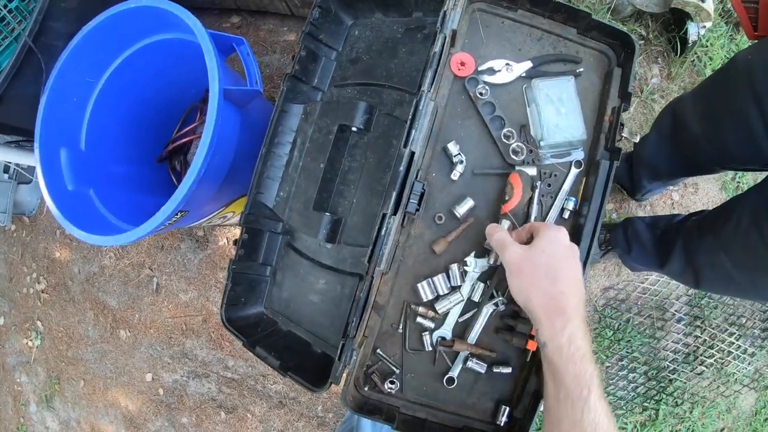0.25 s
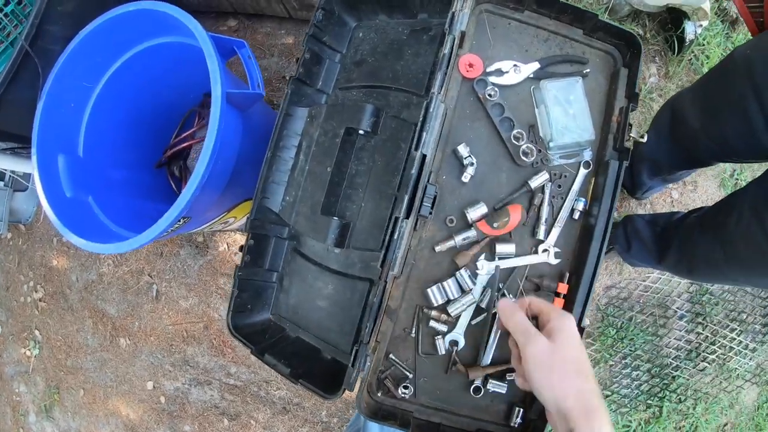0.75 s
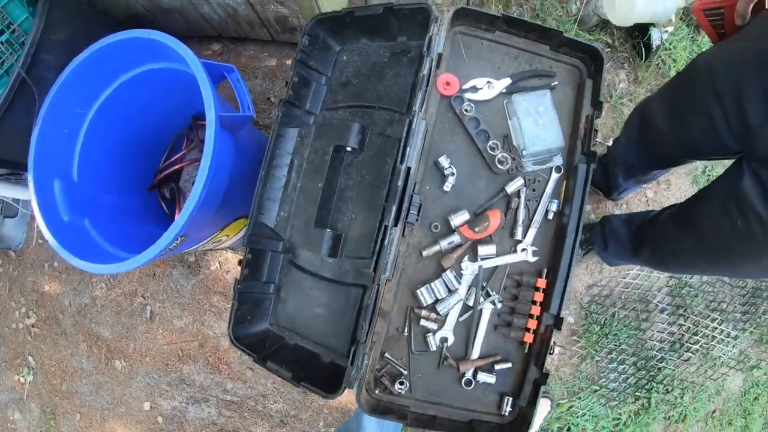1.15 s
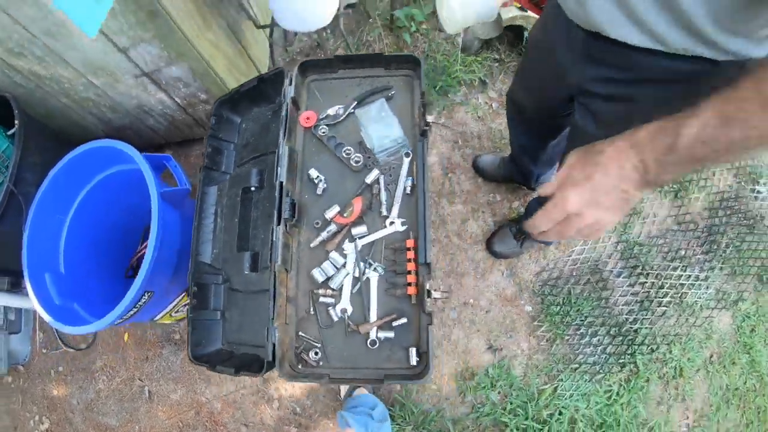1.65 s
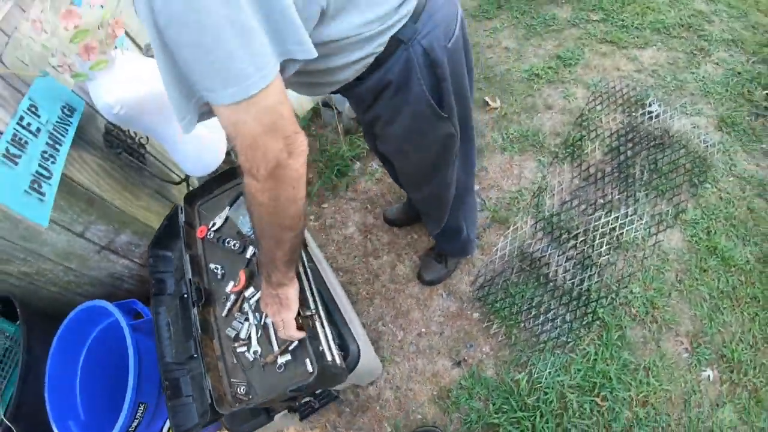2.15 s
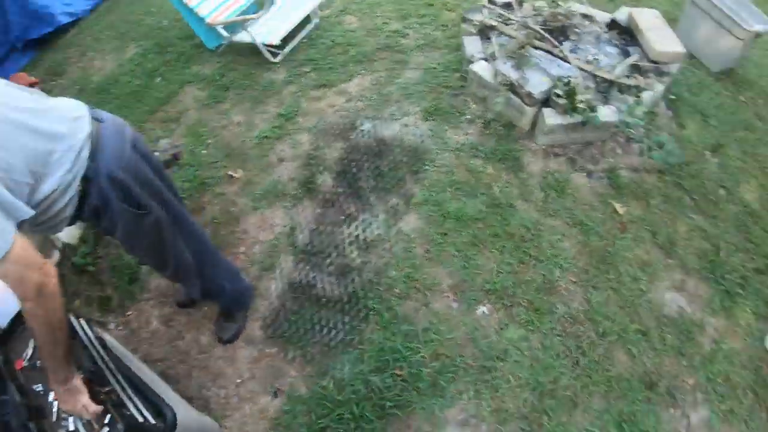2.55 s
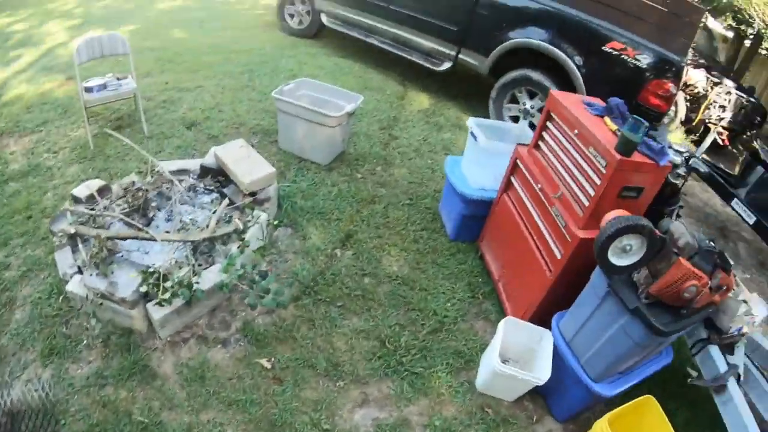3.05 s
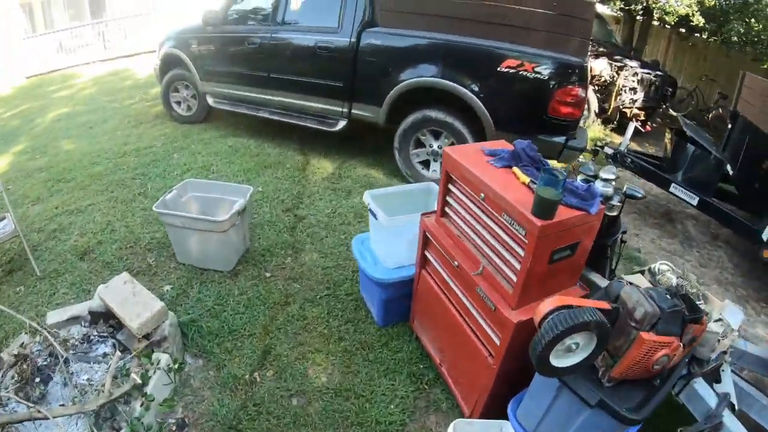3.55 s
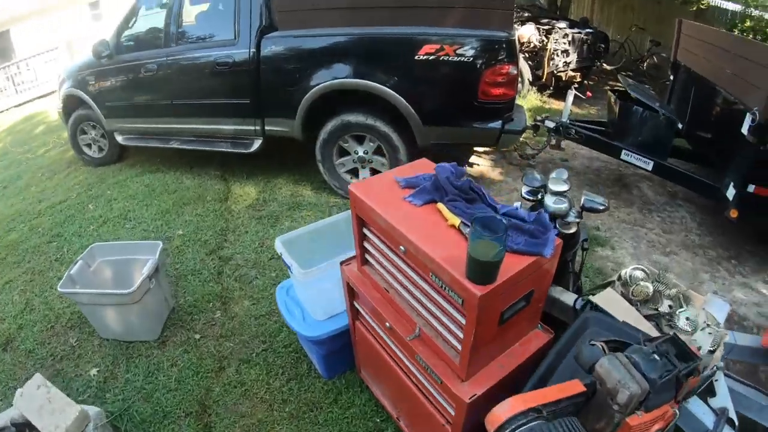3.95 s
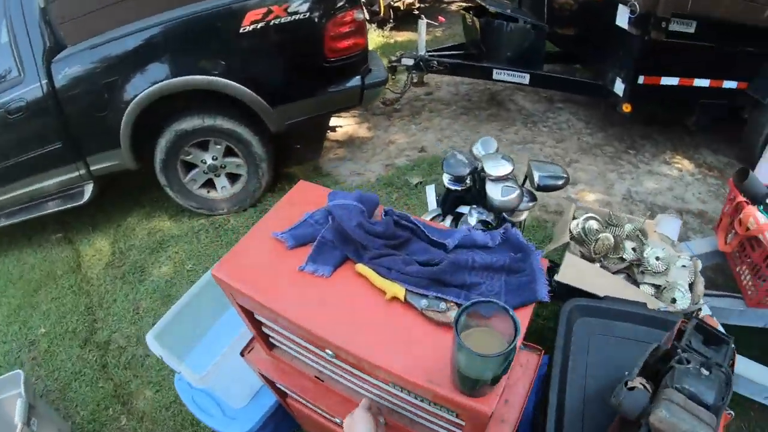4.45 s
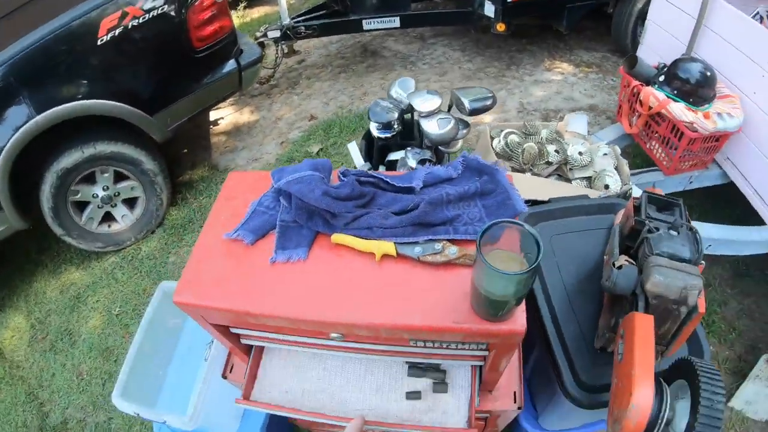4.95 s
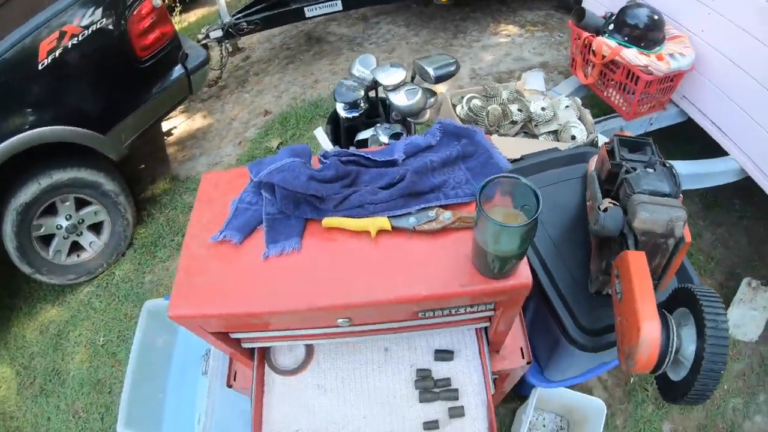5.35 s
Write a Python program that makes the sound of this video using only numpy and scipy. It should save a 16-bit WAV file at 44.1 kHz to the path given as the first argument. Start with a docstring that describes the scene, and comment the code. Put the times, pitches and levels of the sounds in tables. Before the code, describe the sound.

In a yard with high, pulsing insects and faint bird chirps, metal tools are sorted up close in a plastic tray, giving hollow knocks and bright clinks. The clatter stops, then returns briefly and more softly. Low gusts of wind buffet the microphone. Finally a metal drawer slides out with small jolts and ends in one solid thud.

```python
"""Sorting tools in a yard

A hand sorts steel sockets and wrenches in a plastic toolbox tray: they knock and slide on the plastic
and clink on each other. Then a steel chest drawer slides open, jolting, and hits its stop.
Insects buzz and throb, a bird chips, a far tone comes and goes, wind rumbles on the microphone ports."""
import sys
import numpy as np
from scipy import signal
from scipy.io import wavfile

SR = 44100
rng = np.random.default_rng(int(sys.argv[2]) if len(sys.argv) > 2 else 0)


def to_wav(s):
    """Save 16-bit WAV."""
    ch = np.atleast_2d(s).T  # columns
    pcm = np.round(np.clip(ch, -1, 1) * 32767)  # PCM
    wavfile.write(sys.argv[1], SR, pcm.astype(np.int16))


N = 247167
T = np.arange(N) / SR

# background level, ducking after the loud knocks and then recovering:
# time_s, far_noise_db, throbbing_insect_db
BACKGROUND_LEVELS = [(0, -44, -48), (.5, -44, -50), (.85, -52.5, -55), (1.3, -43.5, -53), (1.9, -46, -52.5),
                     (2.4, -42.5, -55.5), (4.2, -43.5, -51), (4.8, -44, -49.5), (5.6, -44, -50.5)]
# tools sliding over the tray and each other, one list a gesture: time_s, level_db, grit_over_level_db
TOOL_SLIDES = [
    [(0, -42.5, -5), (.12, -38.5, -21), (.19, -47.5, -12), (.25, -30.5, -14.5), (.39, -45, -37),
     (.52, -28.5, -17), (.6, -32.5, -9.5), (.72, -22.5, -20), (.82, -45, -19), (.95, -55, -21)],
    [(2.5, -54, 0), (2.62, -45.5, -8.5), (2.72, -37, -12), (2.83, -51.5, -3), (2.9, -78, -6)],
]


def from_db(db):
    """Decibels to gain."""
    return 10 ** (np.asarray(db) / 20)


def unit_rms(x):
    """Scale to an rms of 1."""
    return x / np.sqrt(np.mean(x ** 2) + 1e-20)


def curves(rows, gated=False):
    """Breakpoint columns as curves in time; gated ones drop to -200 outside their span."""
    times, *columns = np.transpose(rows)
    outside = -200 if gated else None
    return [np.interp(T, times, column, outside, outside) for column in columns]


def at_hz(points, hz):
    """Read a spectrum on a log-frequency axis."""
    freqs, values = np.transpose(points)
    return np.interp(np.log(hz), np.log(freqs), values)


def pan_gains(pan_db):
    """Left and right gains; pan_db is always left over right."""
    return from_db(np.multiply.outer([.5, -.5], pan_db))


def band(x, low_hz, high_hz, order=2):
    """Butterworth band-pass."""
    return signal.sosfilt(signal.butter(order, [low_hz, high_hz], "band", fs=SR, output="sos"), x)


def drift(rate_hz):
    """Smooth random wander with a spread of 1."""
    pole = np.exp(-80 * np.pi * rate_hz / SR)
    slow = signal.lfilter([1], [1, -2 * pole, pole * pole], rng.standard_normal(N // 40 + 2002))[2000:]
    return np.interp(np.arange(N) / 40, np.arange(len(slow)), unit_rms(slow - slow.mean()))


def ring(drive, hz, t60_s):
    """One resonance: a unit click starts a dying sine of height 1."""
    pole, step = from_db(-60 / (t60_s * SR)), 2 * np.pi * hz / SR
    return signal.lfilter([0, np.sin(step)], [1, -2 * pole * np.cos(step), pole * pole], drive + 1e-18)


def stereo_noise(correlation):
    """White noise with a given left-right correlation."""
    mid, side = rng.standard_normal((2, N))
    return np.sqrt((1 + correlation) / 2) * mid + np.sqrt((1 - correlation) / 2) * side * [[1], [-1]]


def flickering_noise(spectrum, correlations, low_hz, bands, flicker_db, rate_hz, shared):
    """Third-octave noise bands that flicker partly together, each with its own stereo width; rms 1."""
    out, edges = 0, low_hz * 2 ** (np.arange(bands + 1) / 3)
    white, together = rng.standard_normal((2, 2, N)), drift(rate_hz)
    for k, (low, high) in enumerate(zip(edges, edges[1:])):
        mid, side = band(white[k % 2], low, high)
        hz = np.sqrt(low * high)
        alike = np.clip(at_hz(correlations, hz), -1, 1)
        gain = from_db(at_hz(spectrum, hz) + flicker_db * (shared * together + drift(rate_hz)))
        out = out + gain * (np.sqrt(1 + alike) * mid + np.sqrt(1 - alike) * side * [[1], [-1]])
    return unit_rms(out)


def grit_curve(slides):
    """Level in dB of the grit under a set of sliding gestures."""
    return np.max([sum(curves(slide, gated=True)) for slide in slides], axis=0)


def far_noise():
    """The yard's noise bed: a steady wash, low-passed at 10.6 kHz."""
    spectrum = [(120, 6), (200, 3.5), (300, -7), (530, -8), (850, -12.5), (3060, -20.5), (5070, -24.5),
                (6500, -20), (8400, -18.5), (10300, -42.5), (11400, -51), (15000, -45)]  # colour: freq_hz, density_db
    correlations = [(60, 0.38), (180, 0.92), (550, 0.59), (1650, 0.034), (4970, 0.48), (15000, -1.1)]  # stereo image: freq_hz, correlation
    bed = flickering_noise(spectrum, correlations, 154.8, bands=20, flicker_db=2, rate_hz=10.5, shared=.4)
    bed *= from_db(curves(BACKGROUND_LEVELS)[0])
    return signal.sosfilt(signal.butter(4, 10600, fs=SR, output="sos"), bed)


def far_tones():
    """Two thin, wavering sines about an octave apart, off to the right."""
    low_tone = [(.82, 542, -57), (1.22, 540, -60), (1.32, 513, -56), (1.75, 518, -55), (2.05, 513, -63),
                (2.32, 514, -52), (2.6, 514, -62)]  # comes and goes: time_s, pitch_hz, level_db
    high_tone = [(1.1, 1008, -70), (1.15, 1008, -57), (1.45, 1006, -63)]  # joins briefly: time_s, pitch_hz, level_db
    out = 0
    for tone in (low_tone, high_tone):
        phase = 2 * np.pi * np.cumsum(curves(tone)[0]) / SR
        level = from_db(curves(tone, gated=True)[1] + 2 * drift(26))
        out = out + np.sqrt(2) * level * np.sin(phase + [[.6], [-.6]])
    return out * pan_gains(-5.5)[:, None]


def insects():
    """A chorus blurs into a narrow buzz; a nearer insect rasps in regular throbs."""
    buzz_bands = [(7500, 590, -52), (7750, 160, -58)]  # the chorus: centre_hz, width_hz, level_db
    swell = [(0, -3), (2.2, 1), (4.2, 0.5), (5.6, 0)]  # its slow rise and fall: time_s, gain_db
    throb_rate_hz, first_throb_s = 13.51, .0454
    buzz = 0
    for hz, width, db in buzz_bands:
        level = from_db(db + 2 * drift(28))
        buzz = buzz + level * unit_rms(band(stereo_noise(-.13), hz - width / 2, hz + width / 2, order=3))
    rasp = unit_rms(band(stereo_noise(-.32), 6800, 7300))
    beat = np.cos(2 * np.pi * throb_rate_hz * (T - first_throb_s))
    throb_db = curves(BACKGROUND_LEVELS)[1] + 8 * (beat - .6) + 1.5 * drift(90)
    return from_db(curves(swell)[0]) * buzz + from_db(throb_db) * rasp


def bird():
    """Short arched whistles that climb through each phrase, smeared by echoes from the trees."""
    phrases = [(0.069, .12, -45.5, 4500), (0.767, .817, -58, 4040), (1.542, 1.542, -54, 4250),
               (1.722, 1.87, -56, 4100), (2.065, 2.065, -56, 4620), (2.16, 2.21, -57, 4200),
               (2.473, 2.473, -54, 4180), (2.82, 2.912, -53.5, 4120), (3.84, 3.99, -56, 4060)]  # runs of chips: first_chip_s, last_chip_s, start_db, start_hz
    chip_s, spacing_s, fall_hz = .036, .049, 420
    rise_hz_per_s, swell_db_per_s = 690, 41
    out, n, waver_hz = np.zeros((2, N)), int(chip_s * SR), 40 * drift(60)
    arch_hz = fall_hz * (.25 - np.linspace(-.5, 1, n) ** 2)
    for first, last, start_db, start_hz in phrases:
        for s in np.linspace(first, last, 1 + round((last - first) / spacing_s)):
            at = int(s * SR) - n // 2
            hz = start_hz + rise_hz_per_s * (s - first) + waver_hz[at:at + n] + arch_hz
            envelope = from_db(start_db + swell_db_per_s * (s - first)) * np.hanning(n)
            out[:, at:at + n] += envelope * np.sin(2 * np.pi * np.cumsum(hz) / SR + [[.6], [-.6]])
    age = T[:SR // 8]
    echoes = rng.standard_normal((2, len(age))) * from_db(-33 - 60 * age / .2)
    out *= from_db(2.5 * drift(120))  # leaves and air break the tone up
    return out + signal.fftconvolve(out, echoes, axes=1)[:, :N]


def wind():
    """Lumpy turbulence, partly different at each microphone port; stronger gusts reach higher."""
    gusts = [(0.0, -42.5, 0.5), (1.54, -36, 0), (1.7, -28, -0.5), (1.79, -29.5, -5), (1.9, -25, 6.5),
             (2.0, -30, 18), (2.07, -27, -8), (2.3, -41, 5), (3.21, -27, -9), (3.32, -29, -14.5),
             (3.52, -29, -9.5), (3.6, -22.5, -1), (4.09, -33.5, -15.5), (4.17, -26.5, -8.5),
             (4.26, -19.5, 11), (4.38, -17.5, 2.5), (4.66, -26, 11), (4.79, -25, -6.5), (5.13, -27, 5),
             (5.22, -29, -16), (5.33, -30.5, 9), (5.6, -28.5, 0.5)]  # buffeting: time_s, level_db, pan_db
    spectrum = [(15, -7.5), (39, -1.5), (86, 3.5), (157, -5), (193, -15), (336, -27.5), (438, -56),
                (500, -37), (650, -68)]  # rumble colour: freq_hz, density_db
    level_db, pan_db = curves(gusts)
    rumble = flickering_noise(spectrum, [(20, .61), (500, .51)], 16.15,
                              bands=15, flicker_db=1, rate_hz=12.8, shared=2.04)
    dull = unit_rms(signal.sosfilt(signal.butter(2, 110, fs=SR, output="sos"), rumble))
    brightness = np.clip((level_db + 37) / 14, 0, 1)
    return from_db(level_db) * pan_gains(pan_db) * (dull + brightness * (rumble - dull))


def rustles():
    """Brief rustles and scrapes: bell-shaped puffs of band noise."""
    puffs = [(2.23, -52.5, 1440, 1.7, 0.49), (3.901, -42, 860, 1.3, 0.011),
             (4.157, -48.5, 1680, 1.27, 0.078), (5.056, -31.5, 547, 1.12, 0.056),
             (5.116, -35, 755, 1.12, 0.096), (5.152, -36.5, 2330, 1.16, 0.019),
             (5.164, -35.5, 1280, 1.1, 0.024)]  # one a row: peak_s, level_db, centre_hz, edge_over_centre, length_s
    out = 0
    for peak_s, db, hz, edge, length_s in puffs:
        envelope = from_db(db) * np.exp(-4 * ((T - peak_s) / length_s) ** 2)
        out = out + envelope * unit_rms(band(stereo_noise(.66), hz / edge, hz * edge))
    return out


def struck_box(hits, modes, pan_path, slides, chatter_s, crack_s, drive_db, spread_db,
               flex_hz, flex_db, flex_s):
    """Blows click and chatter into a box's modes, crack and flex its floor; slides feed it grains."""
    favour_db, favour_octaves = 10, .16  # lift for modes near the pitch of a blow
    high_mode_hz, flex_lag_s, grains_per_s = 2050, .002, 1500
    start_s, knock_db, thud_db, crack_db, pitch_hz = np.transpose(hits)
    at, pan_db = (start_s * SR).astype(int), curves(pan_path)[0]
    pan = pan_gains(pan_db)

    def blows(db, fall_s):
        """A click at each blow, and an envelope that jumps there and dies."""
        clicks = np.zeros((*np.shape(db)[:-1], N))
        clicks[..., at] = from_db(db)
        return clicks, signal.lfilter([1], [1, -np.exp(-1 / (fall_s * SR))], clicks + 1e-18)

    grains = (rng.random(N) < grains_per_s / SR) * from_db(1.6 * np.minimum(rng.exponential(1, N), 4))
    out, rubbed, noise = np.zeros((2, N)), np.zeros((2, N)), rng.standard_normal((2, N))
    for hz, mode_db, t60_s in modes:
        strength_db = knock_db + drive_db + mode_db + rng.normal(0, .65, len(at))
        strength_db += favour_db * np.exp(-(np.log2(hz / pitch_hz) / favour_octaves) ** 2)
        # heavy blows drive the low modes, hard edges the high
        strength_db += thud_db * np.clip((520 - hz) / 200, 0, 1) + crack_db * (hz > high_mode_hz)
        # lows reach both ports alike, upper modes beam unevenly
        beam_db = rng.normal(pan_db[at] * min(hz / 550, 1) ** 2, spread_db * min(hz / 1100, 1) ** 2)
        shake, side = np.roll(noise, rng.integers(N), axis=1)  # each mode feels the contact its own way
        settle_s = chatter_s * max(1, 330 / hz)  # the lowest modes build up more slowly
        click, chatter = blows(strength_db + np.multiply.outer([.5, -.5], beam_db), settle_s)
        impact = .93 * min(hz / 400, 1) * click * np.sign(shake)
        out += ring(impact + 1.57 * chatter * shake / np.sqrt(settle_s * SR), hz, t60_s)
        friction = grains * (shake + min(hz / 2500, .6) * side * [[1], [-1]])
        rubbed += from_db(mode_db - 43 * (hz > high_mode_hz)) * ring(friction, hz, t60_s)
    # the floor gives just after the contact: a thump that swells for flex_s, then dies
    push = np.roll(blows(knock_db + thud_db + flex_db, flex_s)[0], int(flex_lag_s * SR))
    flex_t60_s = flex_s * np.log(1000)
    out += ring(ring(push, flex_hz, flex_t60_s), flex_hz, flex_t60_s) * 2 * np.e / (flex_s * SR)
    out = band(out, 177, 4740, order=3)  # a small body gives no deep bass, a blunt contact no treble
    crack_bands = [(1900, 3800, .85, -7, 1), (3800, 7000, .5, -12, .7), (7000, 11000, .1, -37, .8)]
    for low_hz, high_hz, correlation, band_db, decay_ratio in crack_bands:
        crack = blows(knock_db + crack_db + band_db, crack_s * decay_ratio)[1]
        out += pan * band(crack * stereo_noise(correlation), low_hz, high_hz)
    rub_db = np.max([curves(slide, gated=True)[0] for slide in slides], axis=0)
    rub = from_db(rub_db) * unit_rms(band(rubbed, 77, 2500))
    grit = unit_rms(band(stereo_noise(.55) * from_db(3.8 * drift(100)), 760, 4000))
    return out + pan * (rub + from_db(grit_curve(slides)) * grit)


def chest_drawer():
    """A steel drawer rubs and jolts along its runners, then bangs on its stop."""
    # jolts: start_s, knock_db, thud_over_knock_db, crack_over_knock_db, pitch_hz
    jolts = [(4.773, -26.5, -29, -5, 810), (4.787, -32.5, -1, 1, 1385), (4.886, -27.5, 3, 0.5, 766),
             (4.922, -28, -7, 0, 530), (5.023, -31, 6, -2, 1000), (5.082, -18.5, -4, -7.5, 1000),
             (5.091, -18, -10, -12, 567), (5.203, -22.5, -20, 5, 443), (5.208, -7, -3.5, 0.5, 620),
             (5.227, -13, -4, -30, 550), (5.308, -31, 6.5, -24, 437)]
    modes = [(169.5, 6.5, 0.074), (226, 2.5, 0.027), (305, -7, 0.14), (373, -2, 0.076), (447, -11, 0.034),
             (553, -7, 0.043), (674, -12, 0.045), (786, -15.5, 0.075), (1026, -11.5, 0.038),
             (1190, -12, 0.021), (1365, -10.5, 0.035), (1620, -9.5, 0.012), (2490, -11, 0.016)]  # drawer resonances: pitch_hz, level_db, t60_s
    runners = [(4.74, -61, -24), (4.78, -38, -21), (4.92, -33, -23), (5.0, -38.5, -16),
               (5.06, -31.5, -18.5), (5.17, -31.5, -22), (5.32, -30.5, -29), (5.42, -42.5, -43)]  # runner friction: time_s, level_db, grit_over_level_db
    pan_path = [(4.7, -2), (5.4, -2)]  # just right of centre: time_s, pan_db
    return struck_box(jolts, modes, pan_path, [runners], chatter_s=.017, crack_s=.014,
                      drive_db=-8.5, spread_db=15, flex_hz=248, flex_db=-8, flex_s=.0052)


def steel_tools():
    """Steel on steel: a bright tick, random pings and a high ring; sliding adds a faint jingle."""
    tools = [
        [(5960, 2, .025), (9480, -2, .05), (10030, -6, .07), (11320, -6, .065), (12720, -8, .07),
         (14020, -13, .07)],
        [(8979, 1, .1), (5922, -10, .03), (15030, -22, .1)],
        [(7662, 6, .25), (9420, -11, .035)],
        [(12540, 0, .12), (11610, -2, .02), (10020, -3, .035)],
        [(9685, 4, .05), (14290, -17, .05), (5950, -7, .025)],
        [(11260, -5, .1), (12680, -10, .12), (5730, 4, .02)],
    ]  # resonances, one list a tool: pitch_hz, level_db, t60_s
    clinks = [(0.149, -37.5, -28, 0, 1), (0.157, -34.5, -28, 0, -4), (.218, -47, -36, 1, -2),
              (0.23, -58, -43, 1, 1), (0.348, -48, -31.5, 2, 1.5), (.381, -65, -38, 5, 1),
              (0.408, -48, -32, 3, -3), (.451, -32, -51, 2, -2.5), (.496, -62, -36, 5, -6),
              (.513, -57, -34, 5, -1), (0.523, -31, -47, 1, -2), (0.534, -51, -27, 1, -3),
              (0.553, -52, -31, 5, -4), (0.564, -42, -28.5, 5, 0), (0.641, -46.5, -51, 2, -5),
              (0.669, -48, -50, 4, 0), (2.735, -46, -48, 4, 2), (2.756, -35.5, -32.5, 4, 4),
              (2.788, -50, -44, 4, 5)]  # contacts: start_s, ring_db, tick_db, tool_index, pan_db
    tick_s, ping_t60_s, touches_per_s = .004, .022, 90
    choke_s = .048  # a ringing tool soon touches another and falls silent
    wobble = from_db(2 * drift(60))  # touching neighbours unsettle the ring
    rings, ticks, age = np.zeros((2, N)), np.zeros((2, N)), T[:SR // 5]
    attack = np.minimum(age / .00053, 1) * (1 + .53 * np.exp(-age / .0047))  # overshoots, drops fast
    envelope = attack / (1 + (age / choke_s) ** 8)
    for start_s, ring_db, tick_db, tool, pan_db in clinks:
        at, pan = int(start_s * SR), pan_gains(pan_db)[:, None]
        ticks[:, at:at + len(age)] += pan * from_db(tick_db) * np.exp(-age / tick_s)
        pings = [(hz, tick_db - 4 - 12 * np.log2(hz / 5000) + rng.normal(0, 3), ping_t60_s)
                 for hz in 5000 * 2 ** rng.uniform(0, 1.5, size=9)]
        modes = [(hz, ring_db + db, t60_s) for hz, db, t60_s in tools[tool]]
        for hz, db, t60_s in pings + modes:
            port_phase = rng.uniform(.51, 1.7) * np.array([[.5], [-.5]])
            partial = from_db(db - 60 * age / t60_s) * np.sin(2 * np.pi * hz * age + port_phase)
            rings[:, at:at + len(age)] += pan * envelope * partial
    touches = 1.3 * (rng.random(N) < touches_per_s / SR) * stereo_noise(.27)
    jingle = sum(from_db(db / 3) * ring(np.roll(touches, rng.integers(N), axis=1), hz, t60_s=.032)
                 for modes in tools for hz, db, _ in modes)
    ticks = band(ticks * stereo_noise(.4), 5000, 9500, order=3)
    return wobble * rings + ticks + from_db(grit_curve(TOOL_SLIDES) - 27) * jingle


def plastic_tray():
    """Tools knock and slide in the tray, whose plastic answers with short, hollow resonances."""
    # tools landing: start_s, knock_db, thud_over_knock_db, crack_over_knock_db, pitch_hz
    knocks = [(0.015, -29.5, -37, 9, 1170), (0.08, -19.5, -14, -29, 740), (0.107, -24, -28, -14, 980),
              (0.148, -7.5, -27, -8.5, 913), (0.159, -14, -5, -4.5, 630), (0.208, -15.5, -8, -16, 650),
              (0.218, -13.5, 1.5, -17, 555), (0.242, -19.5, -4, -5.5, 650), (0.271, -16.5, -5, -20, 657),
              (0.284, -19, 5, -22, 580), (0.302, -4, 0, -18.5, 517), (0.327, -8.5, -11, -30, 585),
              (0.347, -27.5, 14.5, 7.5, 544), (0.37, -17, -6, -7, 716), (0.381, -23, 7, -8, 538),
              (0.406, -6.5, -10, -7.5, 595), (0.425, -8, -27, -34, 547), (0.45, -14, -17, -6, 496),
              (0.461, -10, -9, -30, 622), (0.489, -6, 4.5, -11.5, 1070), (0.512, -11, -17, -16, 630),
              (0.521, -8, -3, -20, 550), (0.533, -7.5, -25, -9, 483), (0.553, -10, -5, -9, 440),
              (0.565, -7.5, -10, -10.5, 646), (0.585, -20, -20, -5, 885), (0.612, -28, -13, -9, 690),
              (0.641, -5.5, -1, -20, 780), (0.659, -5.5, 10, -3.5, 780), (0.684, -3.5, 6, -5.5, 980),
              (0.713, -3, 5.5, -10, 553), (0.74, -24.5, 16, -23, 970), (0.777, -10, -5, -10.5, 790),
              (1.629, -38.5, -16, -1.5, 504), (2.52, -27.5, -30, -9, 1490), (2.674, -31, 4.5, -19, 460),
              (2.735, -11.5, -10, -9.5, 754), (2.758, -14, -7, -11.5, 1490), (2.787, -25, -24, -15, 1500),
              (2.819, -30, 2.5, -26, 1100)]
    modes = [(166, -3, 0.14), (228, 0.5, 0.04), (258, -7.5, 0.06), (358, -0.5, 0.048), (428, -8.5, 0.064),
             (546, -1.5, 0.032), (616, 3.5, 0.01), (708, -6.5, 0.038), (774, -10.5, 0.03), (953, 3, 0.01),
             (1131, -6.5, 0.032), (1220, -2.5, 0.012), (1490, -4.5, 0.0097), (1760, -19.5, 0.025),
             (2073.6, 3, 0.014), (2410, 7, 0.0038), (2480, -0.5, 0.013), (2810, 0.5, 0.024),
             (3160, 1.5, 0.0096), (3610, 0, 0.0096)]  # tray resonances: pitch_hz, level_db, t60_s
    pan_path = [(0, -3), (1.6, -16), (2.5, -5), (2.748, 4.5)]  # the tray's place as the microphone turns: time_s, pan_db
    return struck_box(knocks, modes, pan_path, TOOL_SLIDES, chatter_s=.0072, crack_s=.0068,
                      drive_db=-13.5, spread_db=3.5, flex_hz=242.7, flex_db=-5, flex_s=.003)


def scene():
    """Tray, drawer and tools up close, the yard behind them, wind on the microphone."""
    boxes = plastic_tray() + chest_drawer()
    yard = far_noise() + insects() + bird() + far_tones()
    return boxes + steel_tools() + rustles() + yard + wind()


def record(dry):
    """The capsules hiss faintly, the loudest thuds overload softly and the top is cut."""
    hiss_db, stopband_hz = -80, 16135
    hissy = dry + from_db(hiss_db) * rng.standard_normal(dry.shape)
    clipped = hissy / (1 + np.abs(hissy) ** 6) ** (1 / 6)
    return signal.sosfilt(signal.cheby2(12, 70, stopband_hz, fs=SR, output="sos"), clipped)


dry = scene()
out = record(dry)
to_wav(out)
```